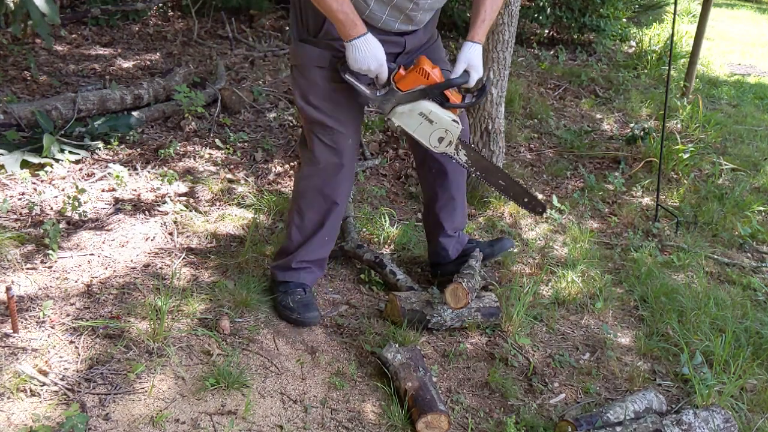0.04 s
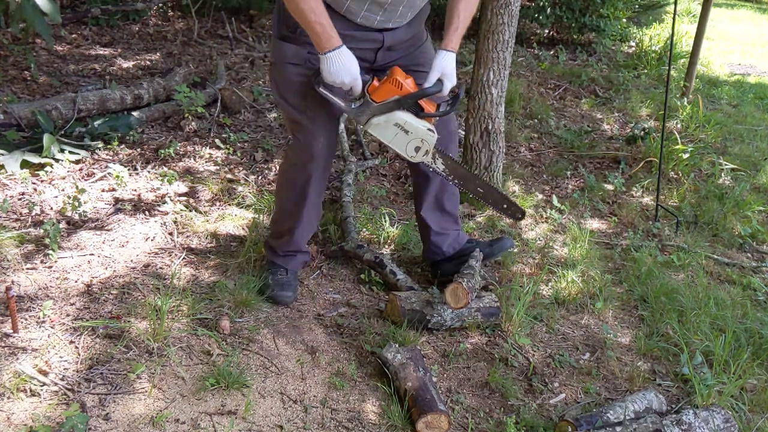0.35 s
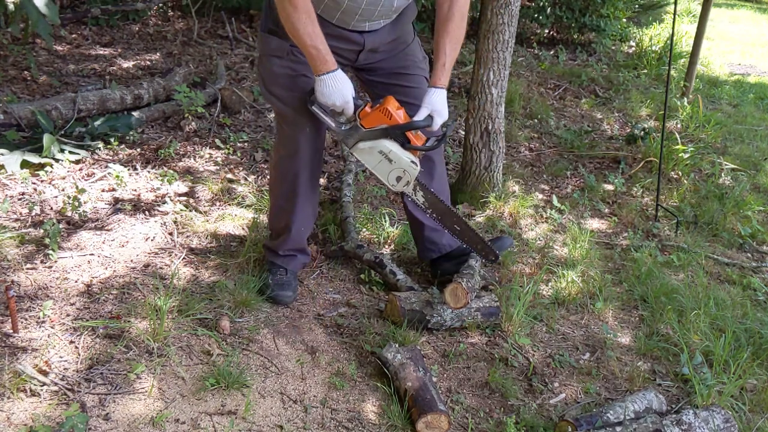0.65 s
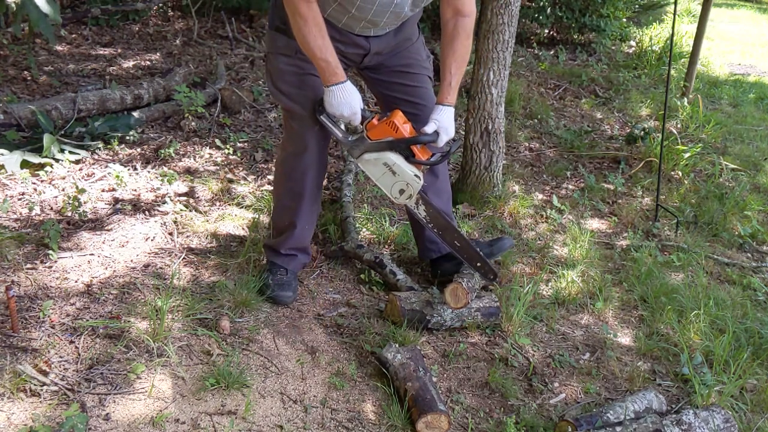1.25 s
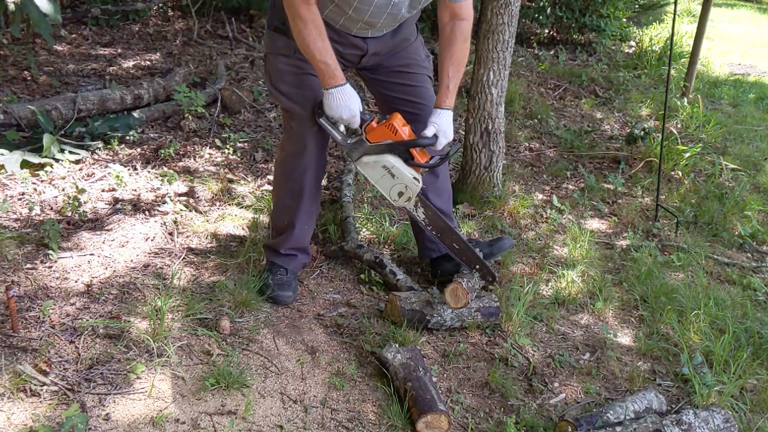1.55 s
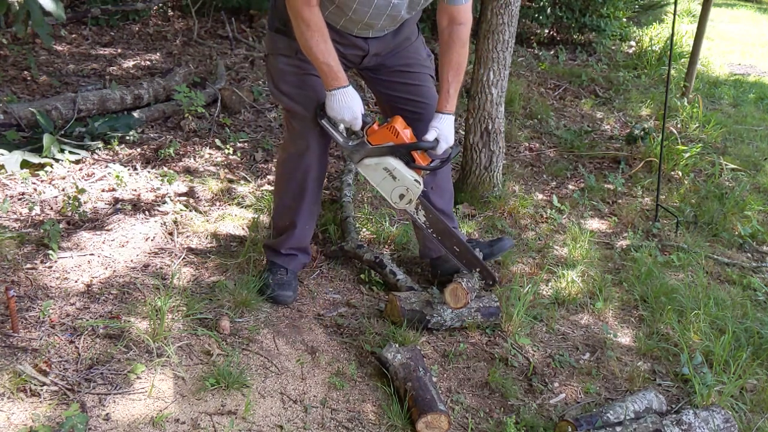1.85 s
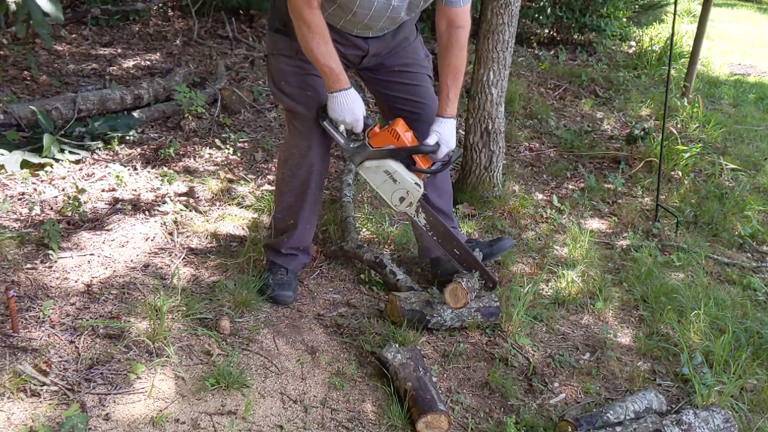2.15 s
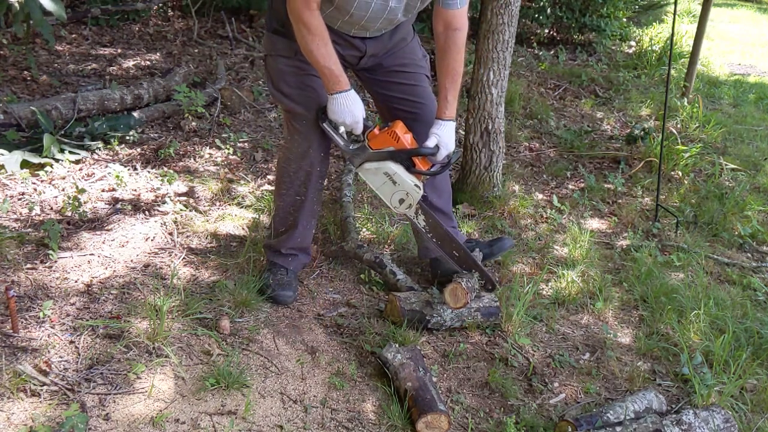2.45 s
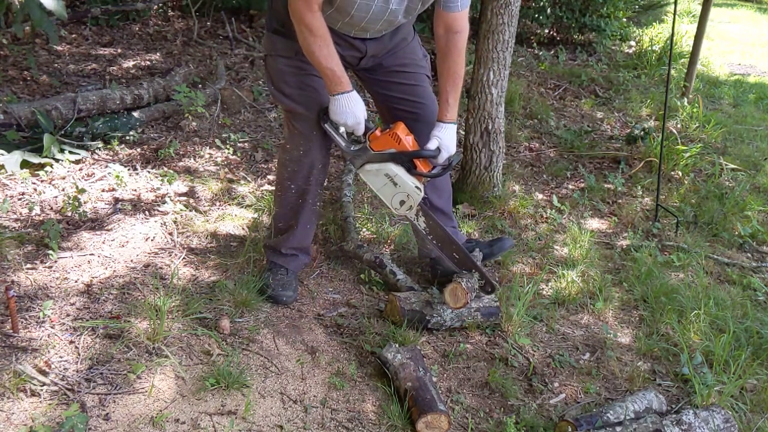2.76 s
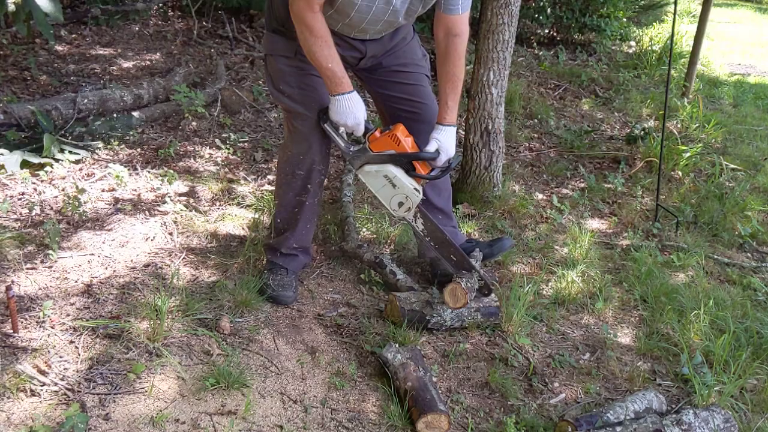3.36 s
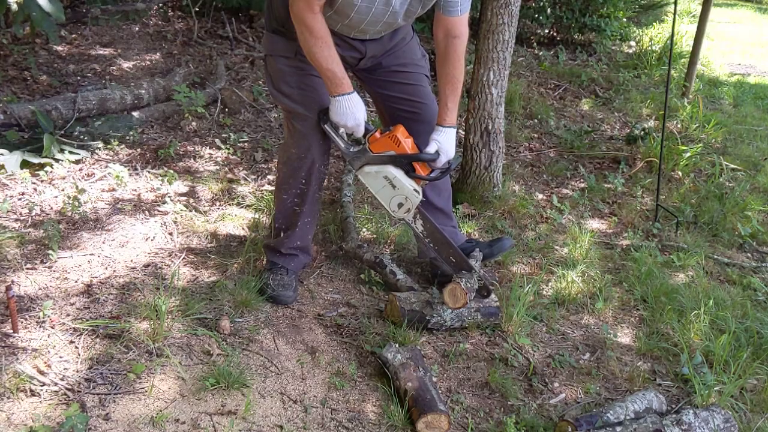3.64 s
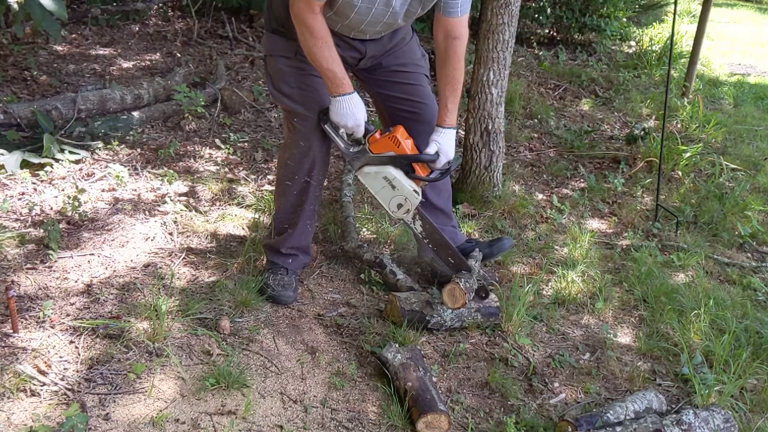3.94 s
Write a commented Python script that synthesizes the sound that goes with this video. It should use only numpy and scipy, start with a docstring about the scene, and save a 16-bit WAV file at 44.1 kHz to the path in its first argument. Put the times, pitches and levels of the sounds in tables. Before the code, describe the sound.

A two-stroke chainsaw idles with uneven pops and a rattling chain. About a second in it revs up, then bites into a log with a loud, steady roar, heard from a few steps away in a wooded yard.

```python
"""A two-stroke chainsaw, a few steps from a stereo pair of microphones in a wooded yard.
It idles unevenly, each firing a pop through the muffler that shakes the slack chain against the bar.
About a second in the throttle opens, the clutch takes the chain along and the engine runs up to a roar;
then the cutters bite into a log. Trunks and ground scatter a short echo over a low background rumble."""
import sys
import numpy as np
from scipy import signal
from scipy.fft import rfft, irfft, next_fast_len
from scipy.io import wavfile
from scipy.ndimage import map_coordinates

SR = 44100
rng = np.random.default_rng(int(sys.argv[2]) if len(sys.argv) > 2 else 0)


def int16_out(signal):
    """Quantize to a 16-bit WAV file."""
    q = np.round(np.clip(np.atleast_2d(signal).T, -1, 1) * 32767)
    wavfile.write(sys.argv[1], SR, q.astype(np.int16))


N = 176400

# crank speed (time [s], firing rate [Hz])
CRANK_SPEED = [(0, 65.1), (0.55, 64.87), (0.8, 64.44), (1.02, 66.18), (1.1, 74.41), (1.155, 76.73),
               (1.25, 94.48), (1.38, 118.31), (1.5, 134.58), (1.65, 152.22), (1.8, 162.79), (1.95, 171.2),
               (2.15, 174.33), (2.45, 177.0), (2.75, 176.1), (3.03, 172.38), (3.4, 170.54), (3.72, 172.96),
               (4, 172.05)]
# exhaust (time [s], firing note level [dB], bark level [dB])
EXHAUST_LEVELS = [(0,-52,-37),(.4,-50,-36.5),(.52,-52,-31.5),(.8,-51,-32),(1.02,-52,-29.5),(1.07,-40,-30.5),(1.14,-34,-29.5),(1.25,-34.5,-23),(1.4,-31,-24),(1.55,-32,-23),(1.75,-30,-19.5),(2,-26.5,-21),(2.5,-27,-20),(3.2,-25.5,-20.5),(4,-25.5,-20.5)]
# uneven idle strokes, most of them weak (time [s], level change [dB])
ODD_STROKES = [(.111,0),(.311,3),(.452,2),(.606,-4),(.621,-6),(.668,-14),(.73,-4),(.745,-11),(.792,-1),(.807,-14),(.991,-1),(1.021,-6),(1.036,-3)]
# muffler at soft idle, at firm idle, running up and under load (frequency [Hz], gain [dB])
MUFFLER_SOFT = [(60,-33),(130,-8),(195,-18),(260,-3.5),(325,-17),(390,4),(460,-5),(585,1.5),(660,-6),(780,4.5),(900,-5),(1110,4),(1250,-13),(3000,-17),(8000,-45)]
MUFFLER_FIRM = [(60,-20),(130,-8.5),(195,-9.5),(260,-10),(325,-0.5),(390,-21.5),(490,-3),(620,-0.5),(780,6),(880,-1.5),(1020,-15),(1400,-24),(3000,-16),(8000,-26.5)]
MUFFLER_RUN_UP = [(70,-29),(150,-24),(210,-15),(320,-6),(410,-7),(470,4),(640,2.5),(730,-2.5),(860,13.5),(1080,-2.5),(1400,4.5),(1750,-10),(2200,-4),(3500,-9),(8000,-49)]
MUFFLER_LOADED = [(170,-54),(345,-2.5),(520,-26),(670,3),(890,4.5),(1040,-12),(1215,3.5),(1390,-5),(1560,-1.5),(1730,-1),(1900,-19.5),(2080,-3),(2450,-20.5),(2770,0),(3050,-19),(4500,-10.5),(8000,-33)]
# partials of the firing note (order, unloaded gain [dB], loaded gain [dB])
NOTE_PARTIALS = [(1,3,-0.5),(2,-11.5,-29.5),(3,-17,-17.5),(4,-7,-8),(5,-6.5,-58),(6,-9.5,-28)]
# chain and bar modes (frequency [Hz], relative level [dB], t60 [s])
LINK_MODES = [(2790,-13,.03),(3550,-14,.03),(4150,-13,.03),(5770,-13,.02),(8350,0,.04),(8500,-7,.014),(11260,-6,.014),(11390,1,.03),(12780,-8,.025),(14800,-3,.016)]
# the clutch snatching at the chain (time [s], level [dB])
SNATCHES = [(1.035,-18),(1.05,-26),(1.064,-18),(1.076,-14.5),(1.092,-23),(1.105,-35)]
# noise colours of rattle, yard, clutch, exhaust gas and chain (frequency [Hz], relative density [dB])
CLATTER_COLOUR = [(100,-7),(400,2.5),(1100,1),(1800,-2),(2400,-2.5),(2800,1),(3100,-4),(3600,-1),(4900,-8.5),(5800,-2.5),(7600,-9),(10000,-5),(13500,-13),(16000,-7)]
YARD_COLOUR = [(20,-9),(50,3),(80,13.5),(130,10),(400,-20),(2000,-44),(16000,-49)]
SNATCH_COLOUR = [(200,-15),(2000,-1),(6000,-1),(8500,1),(16000,-0.5)]
RASP_COLOUR = [(100,-54),(450,-37),(600,-13.5),(720,-1.5),(900,3),(1060,-3.5),(1400,-3),(1750,-6),(2300,-5),(2800,-6.5),(3200,-9),(5000,-14),(7000,-20),(16000,-5)]
CHAIN_COLOUR = [(100,-24),(600,-8.5),(1500,2),(3200,-2.5),(3800,-1.5),(4600,-1),(5300,-1),(6300,-6.5),(7600,-7.5),(10200,-2.5),(11800,-7.5),(13500,-4.5),(16000,-22)]
# exhaust gas and running chain (time [s], level [dB])
RASP_LEVELS = [(0,-70),(1.1,-50),(1.18,-38),(1.3,-33),(1.4,-29.5),(1.6,-30),(1.9,-27),(2.2,-24.5),(2.6,-24),(3.2,-24.5),(4,-24.5)]
CHAIN_LEVELS = [(0,-66),(1.1,-39),(1.18,-28.5),(1.3,-25.5),(1.4,-24),(1.6,-21.5),(1.9,-19.5),(2.2,-19.5),(2.6,-19.5),(3.2,-19.5),(4,-19.5)]
# guide bar resonances (time [s], lower one's level [dB], upper one's level [dB])
BAR_LEVELS = [(1.1,-54,-65),(1.4,-42,-41),(1.75,-44,-41),(1.92,-39,-32),(2.05,-29,-33),(2.17,-39,-33),(2.6,-42,-42),(3,-33.5,-41),(3.4,-38,-42),(3.8,-37,-42),(4,-40,-41)]
# likeness of noise at the two microphones (frequency [Hz], correlation [-1 to 1])
MIC_LIKENESS = [(100,.99),(700,0.9),(1400,0.96),(2800,0.76),(5500,0.41),(9000,-.15),(14000,0.1)]
# balance of the pair (frequency [Hz], left minus right [dB])
MIC_BALANCE = [(100,1.43),(1400,0.47),(2800,-0.9),(5000,3.5),(7000,1),(10000,-2.5),(14000,-4)]

FIRM_S, FIRM_RISE_S = 0.36, 0.18  # the soft idle firms up into hard pops
THROTTLE_S, THROTTLE_RISE_S = 1.053, 0.37
CLUTCH_S, CLUTCH_GRIP_S = 1.07, .035
BITE_S, BITE_RISE_S = 1.76, 0.13  # the engine comes under load


def amp(db):
    """Decibels to gain."""
    return 10 ** (np.asarray(db) / 20)


def unit(x):
    """Scaled to rms 1."""
    return x / np.sqrt(np.mean(x ** 2) + 1e-20)


def along(points, hz):
    """Reads (frequency, value) points on a log axis."""
    freqs, values = np.transpose(points)
    return np.interp(np.log(hz + 1), np.log(freqs + 1), values)


def curves(rows):
    """One value per sample for each column after the time."""
    times, *columns = np.transpose(rows)
    return [np.interp(np.arange(N) / SR, times, column) for column in columns]


def ramp(start, length):
    """Rises from 0 to 1."""
    return np.clip((np.arange(N) / SR - start) / length, 0, 1)


def wobble(rate):
    """A smooth random curve, rate knots a second."""
    return map_coordinates(rng.standard_normal(N // 10), [np.arange(N) * rate / SR])


def filtered(x, response):
    """x through a frequency response."""
    size = next_fast_len(N + SR // 2)
    return irfft(rfft(x, size) * response(np.fft.rfftfreq(size, 1 / SR)), size)[..., :N]


def ring(x, colour, size=4096):
    """x through a minimum-phase body with this colour."""
    cepstrum = irfft(np.log(amp(along(colour, np.fft.rfftfreq(size, 1 / SR)))))
    cepstrum[1:size // 2] *= 2
    cepstrum[size // 2 + 1:] = 0
    return signal.fftconvolve(x, irfft(np.exp(rfft(cepstrum))))[:N]


def pulses(times, sizes, order=8):
    """Impulses placed between samples with a windowed sinc."""
    at = times[:, None] * SR
    taps = np.floor(at).astype(int) + np.arange(1 - order, order + 1)
    weights = np.sinc(taps - at) * np.sinc((taps - at) / order) * sizes[:, None]
    inside = (taps >= 0) & (taps < N)
    return np.bincount(np.clip(taps, 0, N - 1).ravel(), (weights * inside).ravel(), N)


def spread(pair, colour):
    """Two unrelated signals become a coloured stereo sound of rms 1."""
    def response(hz):
        angle = np.arccos(np.clip(along(MIC_LIKENESS, hz), -1, 1)) / 2
        return amp(along(colour, hz)) * [np.cos(angle), np.sin(angle)]
    mid, side = filtered(pair, response)
    return unit(np.array([mid + side, mid - side]))


def hiss(colour):
    """Coloured stereo noise."""
    return spread(rng.standard_normal((2, N)), colour)


def puffs(turns, depth, lag_turns=0.21):
    """A swell once in each turn of the crank."""
    return unit(np.exp(depth * np.cos(2 * np.pi * (turns - lag_turns))))


def crank(waver=.0013, first_stroke_s=.004):
    """Speed, turns made and the moment of each firing; the cut makes the speed waver."""
    speed = curves(CRANK_SPEED)[0] * (1 + waver * ramp(BITE_S, BITE_RISE_S) * wobble(rate=30))
    turns = np.cumsum(speed) / SR - first_stroke_s * speed[0]
    firings = np.interp(np.arange(int(turns[-1])), turns, np.arange(N) / SR)
    return speed, turns, firings


def muffler_smear(pops, delay_s=.0016, corner_hz=1500):
    """The muffler's chambers delay the treble of each pop."""
    def response(hz):
        return np.exp(-2j * np.pi * delay_s * (hz - corner_hz * np.arctan(hz / corner_hz)))
    return filtered(pops, response)


def exhaust_bark(speed, firings):
    """One pop per firing through the muffler; throttle steadies the pops."""
    firm = ramp(FIRM_S, FIRM_RISE_S)
    throttle = ramp(THROTTLE_S, THROTTLE_RISE_S)
    load = ramp(BITE_S, BITE_RISE_S)
    opened = throttle[(firings * SR).astype(int)]
    scatter_db = 1.3 * (1 - opened) + .6 * opened
    jitter_s = .00012 * (1 - opened) + .000025 * opened
    size_draw, time_draw = rng.standard_normal((N // 100, 2))[:len(firings)].T
    size_db = scatter_db * size_draw
    for time, db in ODD_STROKES:
        size_db[np.argmin(abs(firings - time))] += db
    pops = muffler_smear(pulses(firings + jitter_s * time_draw, amp(size_db))) / np.sqrt(speed)
    states = [(MUFFLER_SOFT, 1 - firm), (MUFFLER_FIRM, firm * (1 - throttle)),
              (MUFFLER_RUN_UP, throttle * (1 - load)), (MUFFLER_LOADED, load)]
    bark = sum(share * unit(ring(pops, colour)) for colour, share in states)
    return amp(curves(EXHAUST_LEVELS)[1]) * bark


def firing_note(turns):
    """The piston's steady pumping: a clean note whose overtones thin out under load."""
    load = ramp(BITE_S, BITE_RISE_S)
    waves = sum(amp(free_db + (loaded_db - free_db) * load) * np.sin(2 * np.pi * round(order) * turns)
                for order, free_db, loaded_db in NOTE_PARTIALS)
    return -amp(curves(EXHAUST_LEVELS)[0]) * np.sqrt(2) * waves


def clatter(turns, level_db=-30, uneven_db=1.0, fade_s=0.95):
    """Piston and clutch rattle with each idle stroke, fading as the engine runs up."""
    beat = puffs(turns, depth=0.2) * amp(uneven_db * wobble(rate=55))
    return amp(level_db) * (1 - ramp(CLUTCH_S, fade_s)) * beat * hiss(CLATTER_COLOUR)


def chain_jingle(firings, level_db=-32.5, scatter_db=4, lag_s=.003, scrape_t60_s=0.026):
    """Each idle stroke shakes the slack chain against the bar until the clutch grips."""
    slack = 1 - ramp(CLUTCH_S, CLUTCH_GRIP_S)
    shakes = firings[firings < CLUTCH_S]
    t = np.arange(SR // 10) / SR
    jingle = np.zeros((2, N))
    for hz, db, t60 in LINK_MODES:
        time_draw, size_draw = rng.standard_normal((len(shakes), 2)).T
        taps = pulses(shakes + lag_s * abs(time_draw), amp(scatter_db * size_draw))
        scrape = signal.fftconvolve(taps, amp(-60 * t / scrape_t60_s))[:N] * rng.standard_normal((2, N))
        mode = np.sin(2 * np.pi * hz * t) * amp(-60 * t / t60)
        jingle += amp(db) * unit(signal.fftconvolve(scrape, mode[None], axes=1)[:, :N])
    return amp(level_db) * unit(jingle * slack) * np.sqrt(slack.mean())


def tree_echo(engine, gain_db=-15, t60_s=.16, low_cut_hz=700):
    """Trunks and ground scatter a short, thin echo back to the microphones."""
    thin = filtered(engine, lambda hz: hz / np.hypot(hz, low_cut_hz))
    t = np.arange(SR // 3) / SR
    tail = hiss([(100, 0), (16000, 0)])[:, :len(t)] * amp(-60 * t / t60_s)
    tail /= np.linalg.norm(tail[0])
    return amp(gain_db) * signal.fftconvolve(thin[None], tail, axes=1)[:, :N]


def yard(level_db=-52.5):
    """The low, steady background of the place."""
    return amp(level_db) * hiss(YARD_COLOUR)


def clutch(t60_s=0.023):
    """A few sharp snatches set the chain moving."""
    times, db = np.transpose(SNATCHES)
    decay = amp(-60 * np.arange(SR // 20) / SR / t60_s)
    return signal.fftconvolve(pulses(times, amp(db)), decay)[:N] * hiss(SNATCH_COLOUR)


def gas_rasp(turns, flutter_db=1):
    """Gas rasps out with each firing."""
    level_db = curves(RASP_LEVELS)[0] + flutter_db * wobble(rate=70)
    return amp(level_db) * puffs(turns, depth=0.18) * hiss(RASP_COLOUR)


def running_chain(turns, blows_per_s=1100, scatter_db=2.5, chip_t60_s=0.0025, flutter_db=0.52):
    """The chain hisses round the bar, with a crackle of random cutter blows."""
    blows = (rng.random(N) < blows_per_s / SR) * amp(scatter_db * rng.standard_normal(N))
    t = np.arange(SR // 100) / SR
    chips = signal.fftconvolve(blows, amp(-60 * t / chip_t60_s))[:N] * rng.standard_normal((2, N))
    chain = hiss(CHAIN_COLOUR) + amp(-8) * spread(chips, CHAIN_COLOUR)
    level_db = curves(CHAIN_LEVELS)[0] + flutter_db * wobble(rate=35)
    return amp(level_db) * puffs(turns, depth=0.05) * chain


def guide_bar(centres_hz=(2768, 5150), half_widths_hz=(42, 130), flicker_db=4.5):
    """The running chain excites two narrow resonances of the bar, loudest in the cut."""
    ringing = np.zeros(N)
    for centre, width, db in zip(centres_hz, half_widths_hz, curves(BAR_LEVELS)):
        tone = filtered(rng.standard_normal(N), lambda hz: 1 / (1 + ((hz - centre) / width) ** 2))
        ringing += amp(db + flicker_db * wobble(rate=14)) * unit(tone)
    return ringing


def overtone_flare(turns, order=12, peak_s=1.39, width_s=0.077, level_db=-26.5, rough_db=1.0):
    """A rising nasal tone swells briefly in the run-up, as one overtone sweeps through a resonance."""
    swell = np.exp(-((np.arange(N) / SR - peak_s) / width_s) ** 2)
    tone = np.sqrt(2) * np.sin(2 * np.pi * order * turns)
    return amp(level_db + rough_db * wobble(rate=82)) * swell * tone


def scene():
    """The saw from a few steps away, its engine centred, the yard around it."""
    speed, turns, firings = crank()
    engine = exhaust_bark(speed, firings) + firing_note(turns) + overtone_flare(turns)
    echo = tree_echo(engine)
    rattles = clatter(turns) + chain_jingle(firings) + clutch()
    roar = gas_rasp(turns) + running_chain(turns) + guide_bar()
    return engine + echo + rattles + roar + yard()


def record(dry, top_hz=15800):
    """The two microphones differ in colour and keep nothing above the band limit."""
    sides = np.array([[.5], [-.5]])
    return filtered(dry, lambda hz: amp(along(MIC_BALANCE, hz) * sides) * (hz < top_hz))


dry = scene()
out = record(dry)
int16_out(out)
```